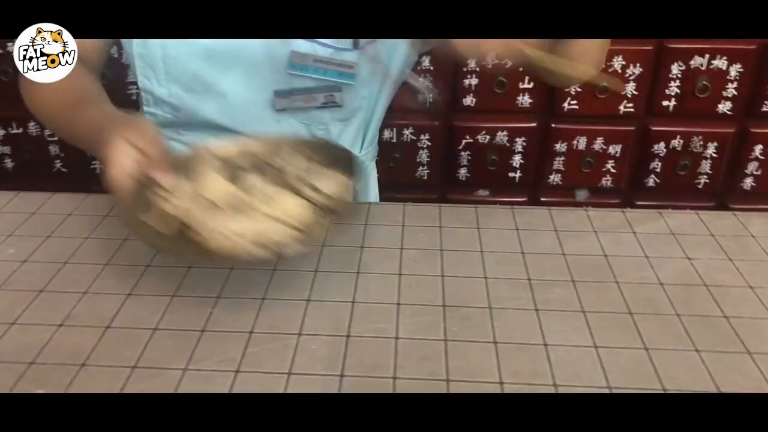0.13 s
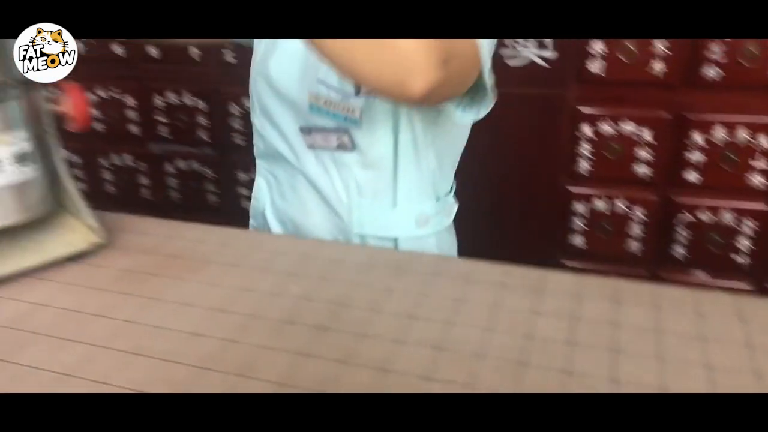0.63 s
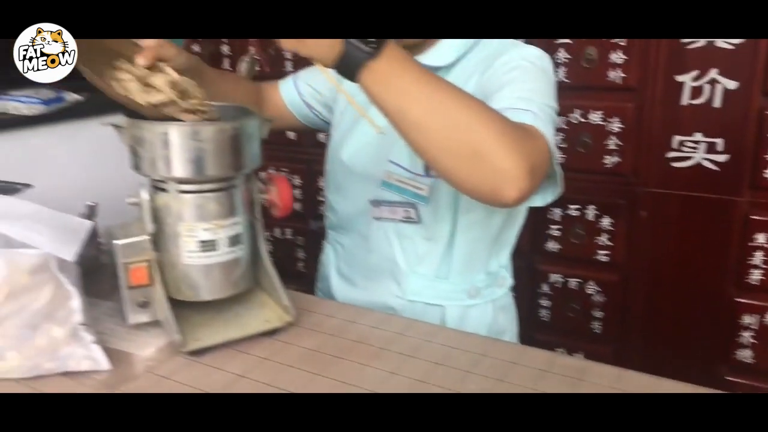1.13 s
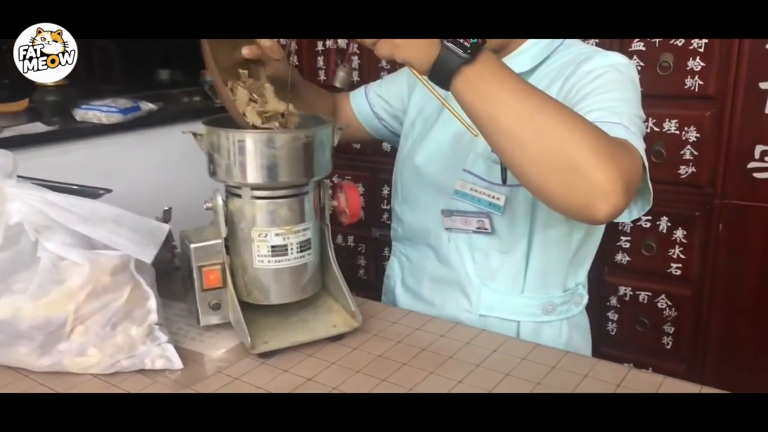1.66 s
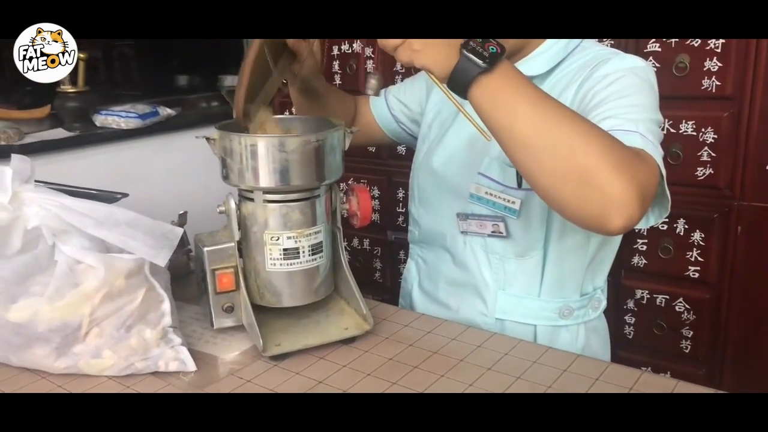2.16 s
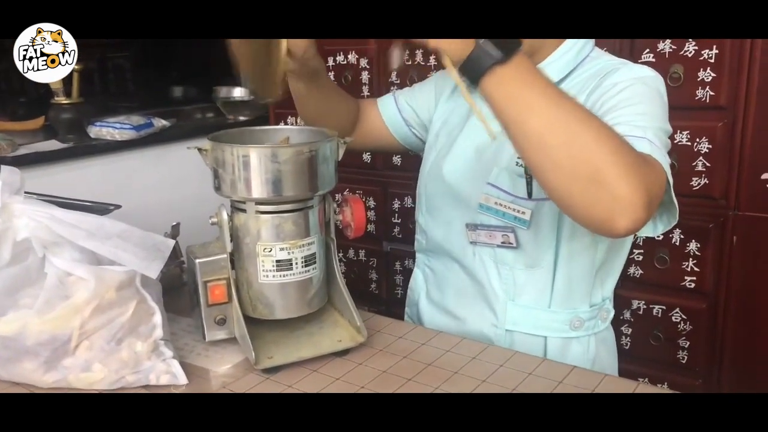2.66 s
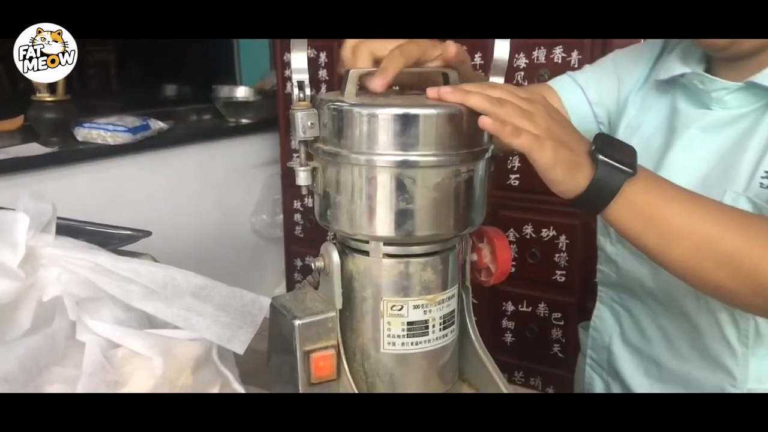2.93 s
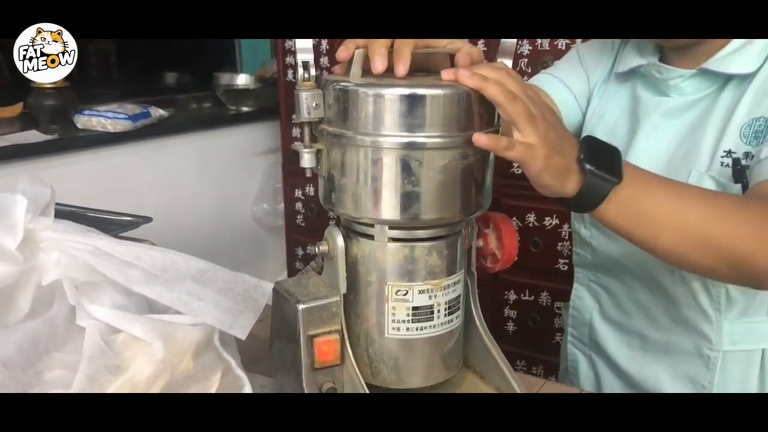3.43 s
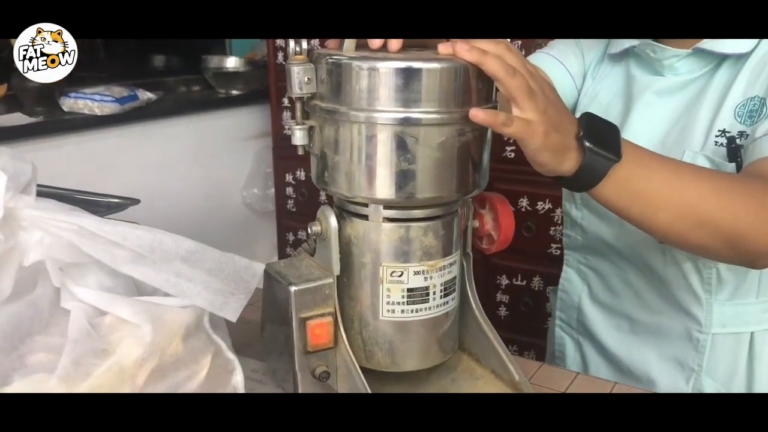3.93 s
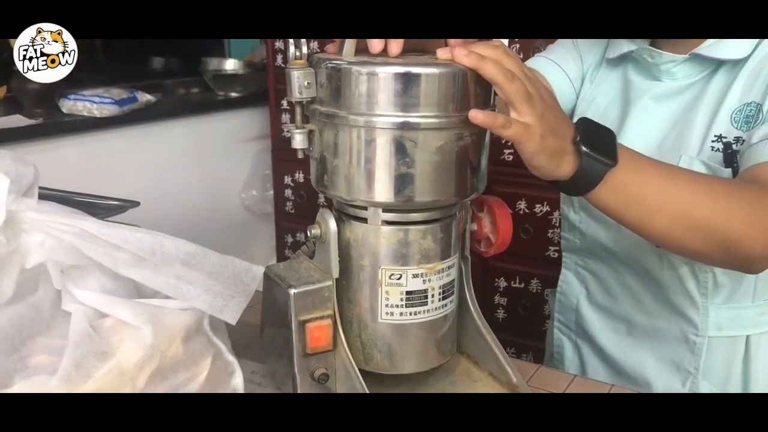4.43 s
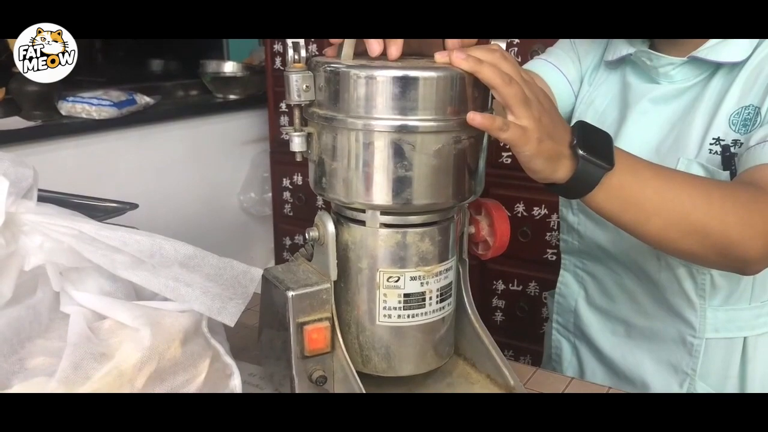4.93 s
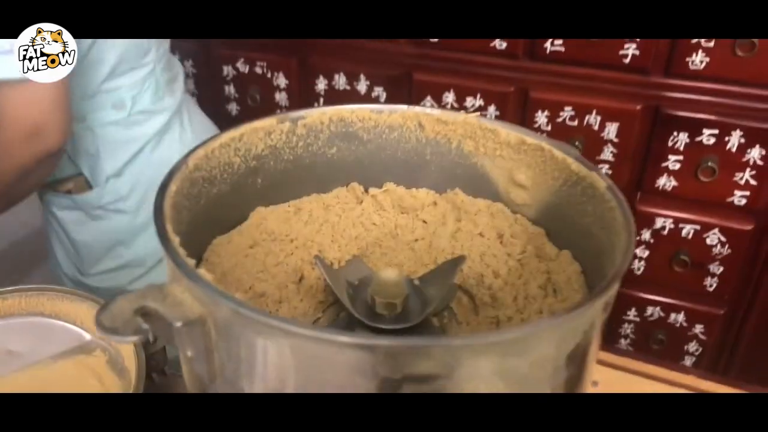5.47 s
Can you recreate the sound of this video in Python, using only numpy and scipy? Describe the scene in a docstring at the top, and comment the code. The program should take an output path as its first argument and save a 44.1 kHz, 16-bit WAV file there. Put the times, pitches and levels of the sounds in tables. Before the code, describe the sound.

For the first 0.17 seconds there is only a dull, quiet room. Then comes faint shop air with a low hum, and a few almost inaudible ticks. Around 0.9 seconds dried pieces knock the open steel cup with clear small pings, followed by a thin crumbly rustle; from 1.7 to 2.5 seconds more pieces patter in, with a sharper clink near 2.0, and a short room echo. At 2.8 seconds a hard cut starts a very loud closed grinder: dense bright rattling, big crunchy chunks, splinter cracks and a metallic ring near 1 kHz that swells unevenly. Its hum and high whine climb in pitch over the first second or so, then steady; the whine is muffled from about 4.7 to 5.05. At 5.3 seconds the roar cuts off abruptly to a much quieter, bassy shop hum, heard closer, with a slight soft brush near 5.5.

```python
"""A short moment of a quiet room comes first: noise shaped to a dull colour.
Then dried herbs are tipped into the steel cup of an electric grinder in a shop: pings, bursts and crumbs.
A cut: the closed grinder runs, its shaft still gaining speed. Random clicks ring the cup as flying chips,
noise bursts are big pieces and splinters, and sine waves are the shaft's hum and whine.
Another cut ends in the shop's hum, heard closer: shaped noise, with a soft brushing."""
import sys
import numpy as np
from scipy import signal
from scipy.fft import rfft, irfft
from scipy.io import wavfile
from scipy.ndimage import uniform_filter1d, minimum_filter1d

SR = 44100
rng = np.random.default_rng(int(sys.argv[2]) if len(sys.argv) > 2 else 0)


def materialize(psi):
    """Save the field psi as 16-bit PCM at rate SR to the path in sys.argv[1].

    A 1-D psi becomes a single channel; in a 2-D psi each row is a channel.
    """
    bounded = np.clip(np.atleast_2d(psi).T, -1, 1)
    quanta = np.round(bounded * 32767).astype(np.int16)
    wavfile.write(sys.argv[1], SR, quanta)


def volts_from_db(level):
    """Convert decibel levels to linear amplitude ratios."""
    exponent = np.asarray(level, float) / 20
    return 10 ** exponent


N = 246089
T = np.arange(N) / SR  # time of each sample, s

# the cuts: shop begins, grinder begins, closer shop begins
SHOP_S, GRIND_S, AFTER_S = 0.17, 2.797, 5.296

# the shaft nears full speed with this time constant; powder packing round the blade slows it for good
START_HZ, FULL_HZ, SPIN_UP_S, SAG_HZ = 328.5, 359.5, 0.58, 3.6
PACKS_S, FREES_S = 4.67, 5.05  # the whine is muffled in between
WHINE_DB, MUFFLED_DB, FREED_DB = -29, -19, -4  # first level, then the changes while packed and once freed
SLOTS = 12  # armature slots: whine cycles in one turn
# Shaft hum from the unbalanced load. Columns: time_s, level_db
SHAFT_UNBALANCE = [(2.8, -18.5), (3.0, -28), (3.06, -41), (3.14, -37), (3.3, -25), (3.5, -23.5),
                   (3.58, -31.5), (3.75, -37.5), (5.3, -39)]

KNOCK_DB, RATTLE_DB, HISS_DB = -26.5, -25.5, -21.5  # heavy, middle and fine chips, before the heaves
# Moments when the load heaves up or slumps. Columns: centre_s, change_db, length_s, extra_middle_chip_db
LOAD_HEAVES = [(2.827, 5.5, .04, -1), (2.862, 2.5, .03, -12), (2.92, -4, 0.07, 4), (3.992, -3.5, .04, -8),
               (4.103, -5, 0.037, -3), (4.144, 4, 0.068, -0.5), (3.455, 1.5, 0.042, -3),
               (4.68, 1, 0.063, -5), (4.79, -1.5, 0.032, -2.5), (5.023, 0, 0.035, -10),
               (5.285, -1, .04, -17)]
# Ringing tones of the closed cup. Columns: pitch_hz, width_hz, gain_db (over the housing)
CLOSED_CUP_TONES = [(709, 100, 13), (1263, 8, 4.5), (1698, 44, 8.5), (1840, 46, 6.5), (2014, 95, 8.5),
                    (2253, 11.7, 11.5), (3594, 17, -4), (3658, 30, 7.5), (3900, 107, 7), (4130, 84, 3),
                    (4960, 110, 10), (5504, 127, 10.5), (5985, 58, 8), (6320, 77, -4), (7080, 200, 7),
                    (7940, 37, -5), (8650, 200, -10.5), (11800, 300, -27), (13400, 60, 7), (14470, 63, -8)]
# Tone colour given by the grinder's housing. Columns: pitch_hz, gain_db
HOUSING_COLOUR = [(40, -19.5), (150, -8), (300, 0), (500, -5.5), (800, -4), (1300, -1.5), (2100, -1),
                  (2650, -8), (3250, -4.5), (4000, -1), (6000, -3), (9000, -2.5), (14100, -2.5),
                  (14700, -50), (16000, -70)]
# Band where cup and housing partly cancel. One row: pitch_hz, width_hz, subtracted_gain_db
CANCELLED_BAND = (2660, 210, -7.5)

# Big chunks struck by the blade. Columns: start_s, level_db, pitch_hz (middle of the spray)
BLADE_CHUNKS = [(2.8046, -11, 4960), (2.8495, -5.5, 5150), (2.9505, -9.5, 5900), (3.0205, -11.5, 6100),
                (3.0548, -10, 4900), (3.0907, -11, 7200), (3.1611, -3.5, 7700), (3.177, -8, 5330),
                (3.2094, -10.5, 7300), (3.2339, -4, 5390), (3.3337, -7, 5070), (3.4536, -6.5, 4960),
                (3.4768, -10, 7390), (3.5207, -6, 4860), (3.5382, -4, 5700), (3.567, -7, 7300),
                (3.6925, -9.5, 4800), (3.7472, -9.5, 5700), (3.9064, -4, 5675), (4.05, -8, 7450),
                (4.1228, -8, 4960), (4.141, -4, 5300), (4.1962, -14, 4960), (4.2715, -7, 4910),
                (4.3224, -2, 5840), (4.3908, -9, 7080), (4.5326, -9.5, 4960), (4.5498, -9, 7080),
                (4.631, -5, 5550), (4.7065, -14, 4960), (4.7763, -6, 4950), (4.8238, -9, 5470),
                (4.9325, -7, 5100), (5.0078, -8, 4800), (5.1233, -7, 4800), (5.184, -10, 4650),
                (5.2257, -9, 7930), (5.2414, -8.5, 7040), (5.264, -6.5, 5640), (5.2842, -10.5, 5570)]
# Hard splinters cracking on the lid, before the chip filter. Columns: start_s, peak_db
SPLINTER_CRACKS = [(3.057, 1), (3.161, -2), (3.298, 3.5), (3.376, 0), (3.414, 4.5), (3.544, -1), (3.804, 2),
                   (3.861, -0.5), (3.973, 0), (3.995, -2), (4.196, -3.5), (4.325, -1.5), (4.489, -4),
                   (4.664, -0.5), (4.776, -2.5), (4.839, 0), (4.885, 1.5), (5.225, -3)]

WALL_HZ, WALL_WIDTH_HZ = 1021.2, 14.6  # the wall's main ring
# Heavy lumps dragged along the wall. Columns: peak_s, drive_db (push on the wall)
DRAGGED_LUMPS = [(2.85, -29.5), (3.05, -37), (3.2, -30.5), (3.35, -28), (3.49, -26.5), (3.6, -23.5),
                 (3.77, -23.5), (4.05, -35), (4.16, -21.5), (4.37, -25.5), (4.56, -37.5), (4.739, -22),
                 (4.93, -24), (5.06, -33), (5.14, -25.5), (5.22, -33)]
LUMP_RISE_S, LUMP_FALL_S, WALL_REST_DB = 0.055, 0.022, -39.5  # two time constants, then steady drive

# Pieces falling in. Columns: start_s, level_db, pitch_hz, body_db, tick_db
# (low body and bright tick are relative to level_db; herbs() trims them)
FALLING_PIECES = [(0.166, -48.5, 780, -17, -11.5), (0.2434, -53, 1580, -9, -7),
                  (0.3754, -55, 872, -14.5, -7.5), (0.3975, -54, 764, -16, -15), (0.59, -52, 970, -21, -18),
                  (0.9158, -26.5, 1610, -7, -14), (0.9285, -29, 1043, -8.5, -22),
                  (1.0904, -50, 754, -9, -12), (1.1886, -41.5, 9150, -19, -10.5),
                  (1.2352, -35, 1570, -7, -19.5), (1.3383, -42, 1050, -21, -36),
                  (1.5189, -54.5, 751, -5, -8), (1.7067, -49, 1010, -15, -7), (1.7624, -47, 1550, -7, -18),
                  (1.7795, -42, 1630, -12, -10.5), (1.8087, -40, 2470, -23, -11),
                  (1.8277, -51, 1540, -16, 1), (1.8697, -39.5, 7290, -10, -10),
                  (1.9066, -44, 7300, -17, -2.5), (1.9428, -42, 7140, -11, -10),
                  (1.9817, -23.5, 4000, -27, -24.5), (2.0644, -34.5, 3860, -28, -16),
                  (2.059, -45, 7460, -20, -8), (2.0877, -45, 3980, -11, -12),
                  (2.1041, -39.5, 2140, -10.5, -26), (2.124, -40.5, 2040, -10, -10),
                  (2.197, -48, 7000, -20, -5), (2.2098, -35.5, 2030, -1.5, -8.5),
                  (2.2287, -35, 5380, -31, -25), (2.2574, -41.5, 980, -21, -8),
                  (2.3325, -45.5, 1530, -6.5, -9), (2.4074, -42.5, 1550, -14, -9),
                  (2.4564, -41, 2100, -21, -13), (2.4793, -43.5, 7250, -23, -3),
                  (2.608, -50.5, 1840, -13, -8.5), (2.6768, -55, 751, -18, -12)]
# Ringing tones of the open cup. Columns: pitch_hz, width_hz, gain_db
OPEN_CUP_TONES = [(810, 68, 2.5), (1043, 51, 6.5), (1570, 115, 1), (2030, 47, -7.5), (2470, 50, -0.5),
                  (3600, 71, -45)]
# Flow of crumbs off the tray. Columns: time_s, level_db (herbs() lifts the dull part)
CRUMB_FLOW = [(0.2, -88), (0.9, -77), (0.95, -62.5), (1.2, -64.5), (1.32, -79), (1.58, -82), (1.7, -60),
              (1.85, -59), (2.0, -72), (2.3, -69), (2.55, -74), (2.78, -73)]
DROP_T60_S = 0.093  # time to fall by 60 dB for a 1 kHz piece
SMALL_DAMP = 0.17  # higher, smaller pieces stop sooner by this power of pitch
SCATTER_T60_S, SCATTER_DB = 0.12, -5.5  # each piece also kicks up crumbs
ROOM_T60_S, ROOM_DB = 0.47, -8.5  # fade of the room's tail, and its strength against the source

# Colour of the shop's air. Columns: pitch_hz, gain_db
SHOP_COLOUR = [(18, -56), (30, -47), (81, -8.5), (240, -2), (404, -8), (472, -9.5), (1060, -21),
               (1140, -20.5), (1560, -23), (2030, -21), (5030, -35), (11900, -46), (15000, -37)]
# Humming tones of the shop. Columns: pitch_hz, width_hz, gain_db
SHOP_HUM_TONES = [(105, 8.7, 1), (171, 27, -5.5), (311, 31, -5.5)]
SHOP_DB, SHOP_RISE_DB, SHOP_RISE_S = -53, -5, 0.6  # starts lower, swells as the phone turns to the counter
# Colour of the quiet room at the start. Columns: pitch_hz, gain_db
QUIET_COLOUR = [(15, -34), (25, -5), (49, -9), (77, -16), (250, -18.5), (475, -12), (529, -29), (588, -12),
                (637, -26), (1350, -31), (2780, -37), (3180, -34.5), (15000, -55)]
# Colour of the shop heard closer at the end. Columns: pitch_hz, gain_db
AFTER_COLOUR = [(18, -46), (30, -22), (102, 0), (171, 4.5), (247, -6.5), (328, -1), (426, -6), (881, -15),
                (1730, -19.5), (2700, -25.5), (12500, -43.5), (13900, -41), (15000, -67)]
QUIET_DB, AFTER_DB = -55.5, -33
BRUSH_S, BRUSH_DB, BRUSH_REST_DB = 5.52, -50, -67  # something brushes nearby once the lid is off

TOP_HZ = 14250  # upper limit of the microphone
CEILING, HOLD_S = 0.5, 0.012  # limiter: largest sample let through, and window length


def level(x, db):
    """Scale a sound to an average (rms) level."""
    return x * volts_from_db(db) / np.sqrt(np.mean(x ** 2))


def level_curve(table):
    """Join (time_s, level_db) points by straight lines, one value a sample."""
    s, db = np.transpose(table)
    return np.interp(T, s, db)


def colour(x, points):
    """Shape the spectrum of a sound by (pitch_hz, gain_db) points."""
    hz, db = np.transpose(points)
    bins = np.fft.rfftfreq(len(x), 1 / SR) + 1
    gain_db = np.interp(np.log(bins), np.log(hz), db)
    return irfft(rfft(x) * volts_from_db(gain_db), len(x))


def band(x, low_hz, high_hz):
    """Keep only what lies between two pitches."""
    edges_hz = [low_hz, min(high_hz, 0.45 * SR)]
    return signal.sosfilt(signal.butter(2, edges_hz, "band", fs=SR, output="sos"), x)


def ring(x, tones):
    """Make tones ring side by side, like struck metal; gain_db holds at each centre."""
    return sum(volts_from_db(db) * signal.lfilter(*signal.iirpeak(hz, hz / width, SR), x)
               for hz, width, db in tones)


def walk(rate):
    """A wandering random curve: `rate` new values a second, smoothed twice."""
    k = int(SR / rate)
    steps = np.repeat(rng.standard_normal(N // k + 1), k)
    return 1.02 * uniform_filter1d(uniform_filter1d(steps, k), k)[:N]


def grains(rate, spread_db):
    """Random clicks of mixed strength, about `rate` a second, at 0 dB rms."""
    chance, size, sign = rng.random(N), rng.exponential(size=N), rng.standard_normal(N)
    strength = volts_from_db(spread_db * np.minimum(size, 3))
    return level((chance < rate / SR) * strength * sign, 0)


def bumps(times, gains, rise_s, fall_s):
    """Sum of swells that grow and die exponentially round their peaks."""
    return sum(g * np.exp(np.minimum((T - s) / rise_s, (s - T) / fall_s)) for s, g in zip(times, gains))


def between(start_s, end_s, fade_s=0.0012):
    """A hard cut: in within a millisecond, out over fade_s."""
    return np.clip((T - start_s) / 0.00082, 0, 1) * np.clip((end_s - T) / fade_s, 0, 1) ** 2


def grinder():
    """Chips hammer the closed cup; the wall rings, the shaft hums and the armature slots whine."""
    packs, frees = (np.clip((T - s) / 0.039, 0, 1) for s in (PACKS_S, FREES_S))  # each goes from 0 to 1
    turn = shaft_turn(packs)
    chips = flying_chips(packs - frees)
    chips = chips - ring(chips, [CANCELLED_BAND])
    return grit() + chips + wall(turn) + shaft_hum(turn) + slot_whine(turn, packs, frees)


def flying_chips(packed):
    """Three sizes of chip surge together, joined by big chunks and splinters."""
    surge = walk(45)
    heave_db = middle_db = 0
    for s, db, length, extra_db in LOAD_HEAVES:
        shape = np.exp(-((T - s) / length * 2) ** 2)
        heave_db = heave_db + db * shape
        middle_db = middle_db + extra_db * shape
    heavy = chip_swarm(surge, 36, 2650, rate=3000.0, own_db=1.3) * volts_from_db(KNOCK_DB + heave_db)
    middle = chip_swarm(surge, 2520, 4400, rate=6000.0, own_db=3.1)
    middle = middle * volts_from_db(RATTLE_DB + heave_db + middle_db - 1.1 * packed)
    fine = chip_swarm(surge, 4300, 20000, rate=12000.0, own_db=1.65) * volts_from_db(HISS_DB + heave_db)
    return heavy + middle + band(fine + chunks() + cracks(), 3260, 18300)


def chip_swarm(surge, low_hz, high_hz, rate, own_db):
    """One size of chip: a swarm that thickens and thins, ringing the cup through the housing."""
    chips = grains(rate, spread_db=1.5) * volts_from_db(0.5 * surge + own_db * walk(60))
    ringing = colour(chips + ring(chips, CLOSED_CUP_TONES), HOUSING_COLOUR)
    return level(band(ringing, low_hz, high_hz), 0)


def chunks():
    """Each big piece shatters in a short spray with its own colour."""
    out = np.zeros(N + SR)  # spare room for the last spray
    n = np.arange(SR // 8) / SR
    for s, db, hz in BLADE_CHUNKS:
        noise = rng.standard_normal((2, len(n)))
        own_colour = level(band(noise[0], hz / 1.09, hz * 1.08), -4.5)
        broad = level(band(noise[1], 4130, 12100), -4)
        fade = volts_from_db(db - 60 * n / 0.026) * np.minimum(n / 0.0022, 1)
        i = int(s * SR)
        out[i:i + len(n)] += fade * (own_colour + broad)
    return out[:N]


def cracks():
    """A few milliseconds of very bright noise for each splinter."""
    out = np.zeros(N)
    n = np.arange(SR // 50) / SR
    for s, db in SPLINTER_CRACKS:
        snap = band(rng.standard_normal(len(n)), 3650, 15300) * volts_from_db(-60 * n / 0.027)
        i = int(s * SR)
        out[i:i + len(n)] += volts_from_db(db) * snap / np.abs(snap).max()
    return out


def shaft_turn(packs):
    """Angle of the shaft: its speed climbs toward full, trembles a little and sags when powder packs."""
    missing_hz = (FULL_HZ - START_HZ) * np.exp(-np.abs(T - GRIND_S) / SPIN_UP_S)
    shaft_hz = FULL_HZ - missing_hz - SAG_HZ * packs
    return 2 * np.pi * np.cumsum(shaft_hz * (1 + 0.00039 * walk(28.95))) / SR


def wall(turn):
    """The lumpy load shakes the wall three times a turn, while chips and dragged lumps keep it ringing."""
    shake = volts_from_db(-11.0 - 46.0 * np.abs(T - GRIND_S)) * np.sin(3 * turn)  # weaker as the load is ground even
    push = grains(rate=1500.0, spread_db=1.0) + shake
    s, db = np.transpose(DRAGGED_LUMPS)
    drag = volts_from_db(WALL_REST_DB) + bumps(s, volts_from_db(db), LUMP_RISE_S, LUMP_FALL_S)
    return ring(push * drag, [(WALL_HZ, WALL_WIDTH_HZ, 28.5)])


def shaft_hum(turn):
    """The unbalanced load shakes once a turn, with a wavering level."""
    return volts_from_db(level_curve(SHAFT_UNBALANCE) + 3.3 * walk(30.34)) * np.sin(turn)


def slot_whine(turn, packs, frees):
    """The armature slots pass many times a turn, a high tone that packed powder muffles."""
    whine_db = WHINE_DB + MUFFLED_DB * (packs - frees) + FREED_DB * frees
    return volts_from_db(whine_db + 2.0 * walk(25)) * np.sin(SLOTS * turn)


def grit():
    """Grit ticks thinly on the lid: sparse clicks open short bursts of bright noise."""
    ticks = signal.lfilter([1], [1, -0.975], np.abs(grains(rate=60.0, spread_db=1.5)))
    return level(band(ticks * rng.standard_normal(N), 8500, 14000), -33)


def herbs():
    """Single pieces ping on the open cup and tumble, over a rattle of crumbs sliding in."""
    pieces = np.zeros(N)
    flow_db = level_curve(CRUMB_FLOW)
    bright, dull = volts_from_db(flow_db), volts_from_db(flow_db + 3.5)
    n = np.arange(SR // 4) / SR
    scatter = volts_from_db(SCATTER_DB - 60 * n / SCATTER_T60_S)
    for s, db, hz, body_db, tick_db in FALLING_PIECES:
        i = int(s * SR)
        pieces[i:i + len(n)] += volts_from_db(db) * falling_piece(n, hz, body_db, tick_db)
        bright[i:i + len(n)] += volts_from_db(db + tick_db) * scatter
        dull[i:i + len(n)] += volts_from_db(db + body_db - 2.5) * scatter
    crumbs = grains(rate=2600.0, spread_db=2.5) * volts_from_db(1.5 * walk(39.8))
    rustle = level(band(crumbs, 6100, 12500) + 0.87 * band(crumbs, 6560, 8140), 0) * bright
    rattle = level(ring(crumbs, OPEN_CUP_TONES) + volts_from_db(-11) * band(crumbs, 900, 4800), 0) * dull
    return room(band(pieces, 250, 16000) + rustle + rattle)


def falling_piece(n, hz, body_db, tick_db):
    """One piece: a pure ping, then noise for its tumble, the cup's body and a bright tick."""
    noise = rng.standard_normal((3, len(n)))
    fade = volts_from_db(-60 * n / DROP_T60_S * (hz / 1000) ** SMALL_DAMP)
    ping_fade = volts_from_db(-60 * n / 0.015) + volts_from_db(-15.5 - 60 * n / 0.12 * hz / 2000)  # quick, then a weak tail
    ping = 0.6 * np.sin(2 * np.pi * hz * n) * ping_fade * np.minimum(n / 0.00045, 1)
    tumble = level(band(noise[0], hz / 1.28, hz * 1.06), -21) * fade ** 0.61
    body = ring(noise[1] * fade, OPEN_CUP_TONES) * volts_from_db(body_db + 3.5)
    body = body + level(band(noise[1], 450, 2444), body_db - 5.5) * fade
    tick = level(band(noise[2], 3300, 11300), tick_db + 1.5) * fade ** 1.03
    return ping + (tumble + body + tick) * np.minimum(n / 0.004, 1)


def room(x):
    """Tiled shop: adds a short tail of fading, band-limited noise as its echoes."""
    n = np.arange(SR // 2) / SR
    tail = band(rng.standard_normal(len(n)), 150, 11000)
    tail = tail * volts_from_db(-60 * n / ROOM_T60_S) * (n > 0.006)
    tail = tail * volts_from_db(ROOM_DB) / np.sqrt(np.sum(tail ** 2))
    return x + signal.fftconvolve(x, tail)[:N]


def brush():
    """Something brushes nearby: dense bright clicks that swell once over a faint rest."""
    stroke = volts_from_db(BRUSH_REST_DB) + bumps([BRUSH_S], [volts_from_db(BRUSH_DB)], rise_s=0.02, fall_s=0.026)
    return level(band(grains(rate=5200.0, spread_db=-4.0), 2500, 14000), 0) * stroke


def shop():
    """The shop's air with humming tones, swelling toward a steady level."""
    hum = level(ring(rng.standard_normal(N), SHOP_HUM_TONES), -3)
    rise_db = SHOP_RISE_DB * np.exp(-(T - SHOP_S) / SHOP_RISE_S)
    return (air(SHOP_COLOUR) + hum) * volts_from_db(SHOP_DB + rise_db)


def air(points):
    """Fans and far traffic: noise whose bass and treble waver apart."""
    x = colour(rng.standard_normal(N), points)
    bass = signal.sosfilt(signal.butter(2, 600, fs=SR, output="sos"), x)
    treble = x - bass
    return level(bass * volts_from_db(1.3 * walk(10)) + treble * volts_from_db(0.74 * walk(13)), 0)


def scene():
    """Four shots joined by cuts: quiet room, herbs in the shop, grinder, closer shop."""
    quiet = between(-1, SHOP_S) * air(QUIET_COLOUR) * volts_from_db(QUIET_DB)
    tipping = between(SHOP_S, GRIND_S) * shop() + between(0, GRIND_S) * herbs()
    grinding = between(GRIND_S, AFTER_S + 0.003, fade_s=0.007) * grinder()
    after = between(AFTER_S - 0.003, 9) * (air(AFTER_COLOUR) * volts_from_db(AFTER_DB) + brush())
    return (quiet + tipping + grinding + after)[None]


def limiter(x):
    """Peaks over the ceiling pull the gain down at once; it holds a moment, then lets go."""
    hold, ahead = int(HOLD_S * SR), SR // 1000
    need = np.minimum(1, CEILING / np.maximum(np.abs(x), 1e-9))
    # the window reaches 1 ms ahead and spends the rest on the past
    held = minimum_filter1d(need, hold, origin=(hold - 1) // 2 - ahead)
    return x * uniform_filter1d(held, ahead)


def band_limit(x):
    """A steep low-pass at the top of the band."""
    return signal.sosfilt(signal.butter(12, 15200, fs=SR, output="sos"), x)


def record(dry):
    """A phone microphone cuts the lowest bass and the top; a limiter catches the peaks."""
    bass_cut = signal.butter(2, 28, "high", fs=SR, output="sos")
    top_cut = signal.ellip(10, 0.3, 60, TOP_HZ, fs=SR, output="sos")
    limited = limiter(signal.sosfilt(bass_cut, dry))
    mix = signal.sosfilt(top_cut, limited)
    return band_limit(mix)


dry = scene()
out = record(dry)
materialize(out)
```